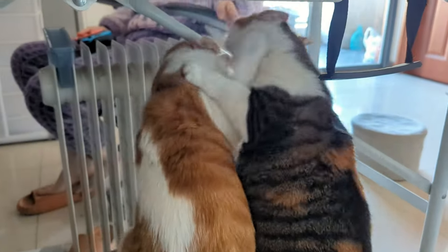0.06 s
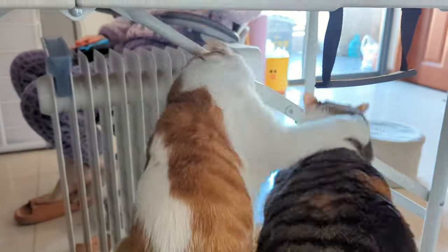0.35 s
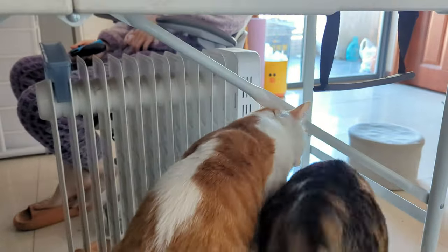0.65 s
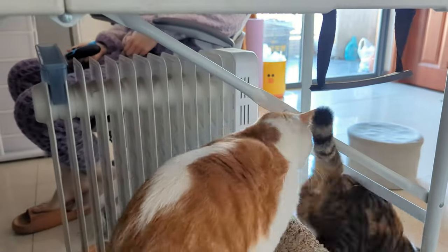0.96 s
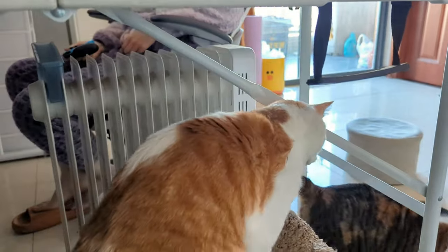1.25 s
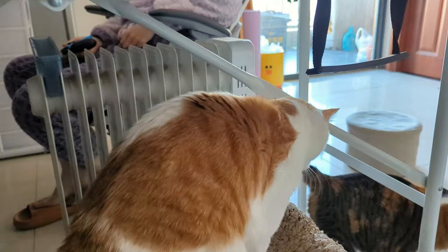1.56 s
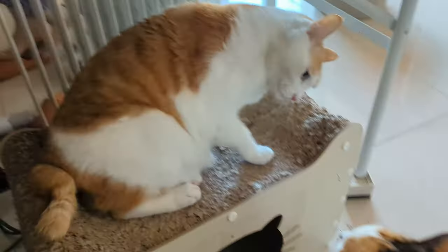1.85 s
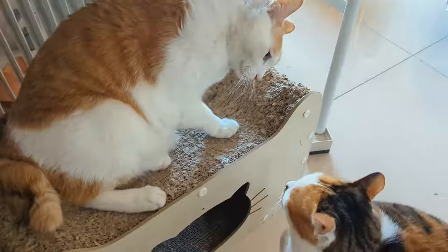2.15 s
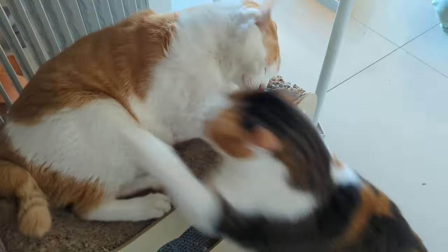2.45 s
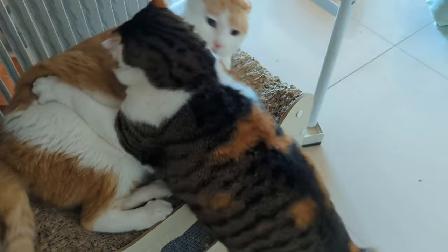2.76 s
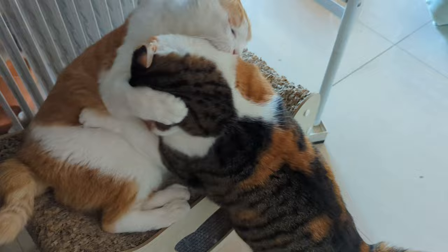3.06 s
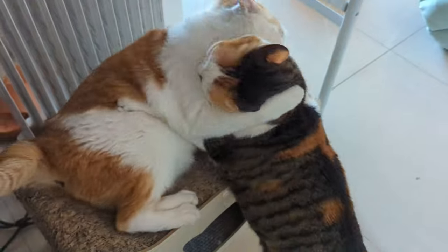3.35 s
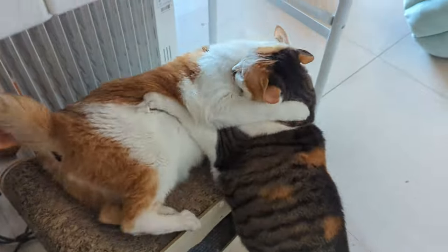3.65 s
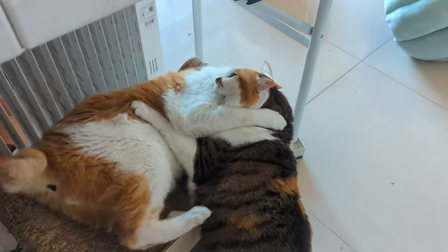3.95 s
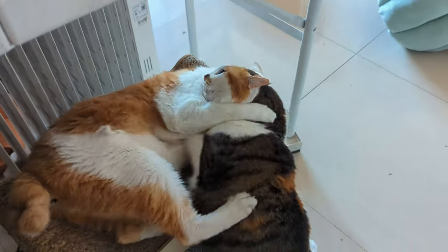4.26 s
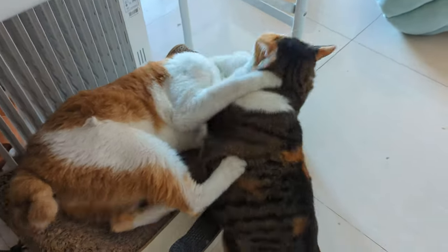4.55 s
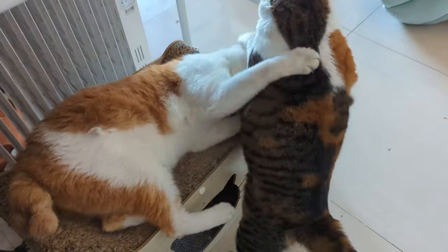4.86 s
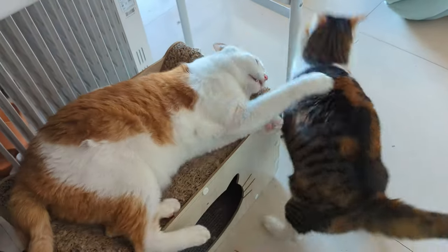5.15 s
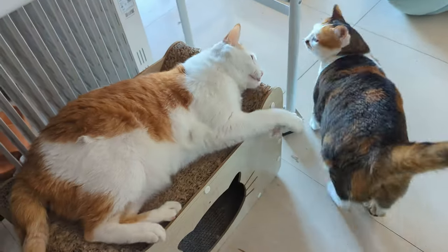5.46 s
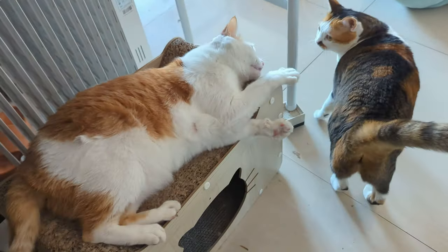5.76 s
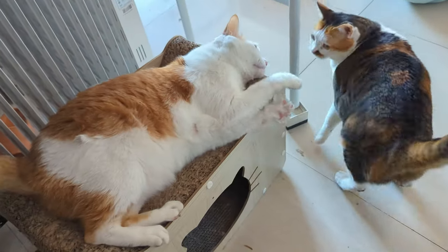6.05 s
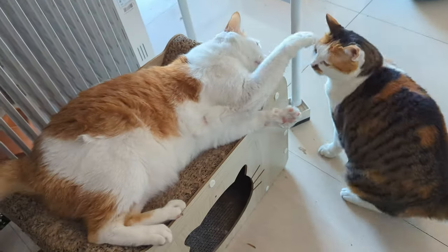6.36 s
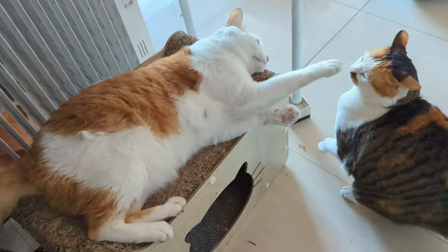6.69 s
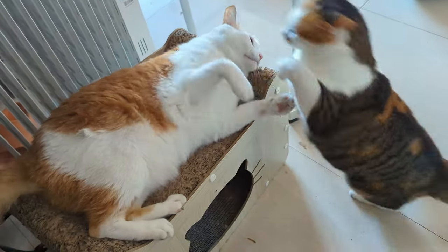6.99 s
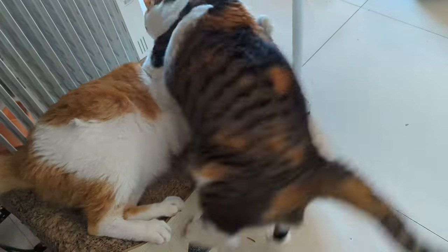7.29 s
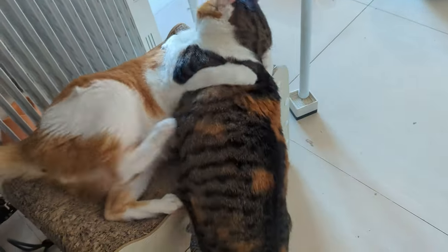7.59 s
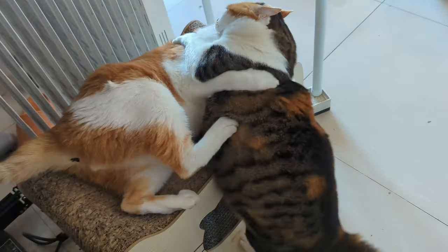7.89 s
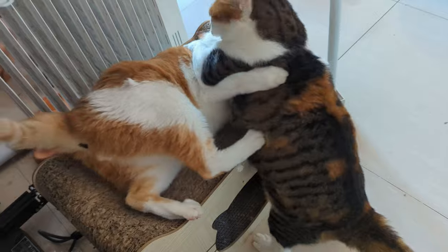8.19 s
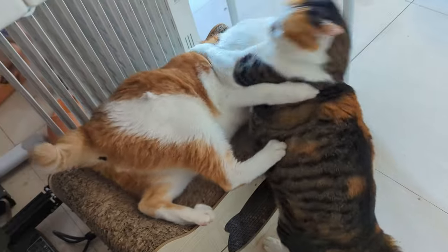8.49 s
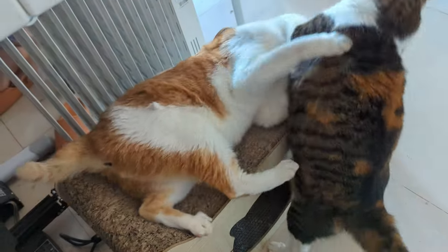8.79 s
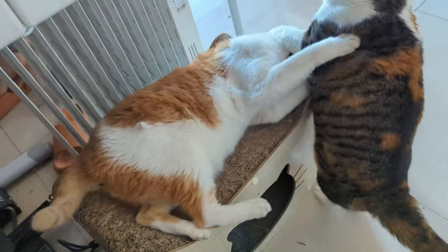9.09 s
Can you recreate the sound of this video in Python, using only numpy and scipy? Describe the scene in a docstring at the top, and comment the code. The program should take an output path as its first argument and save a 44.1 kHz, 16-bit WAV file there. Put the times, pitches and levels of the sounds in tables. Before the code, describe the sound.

Two cats scuffle on a cardboard scratcher, with soft thumps, claws scratching and snapping, and rustling fur over a low rumble.

```python
"""Two cats wrestle on a cardboard scratcher in a tiled room, close to the microphone, over a low rumble.
First a body thumps down, making the board ring, and fur hisses over its ridges. After a lull, claws
catch and snap free around 3 s. Near 4 s a light tap leads into a quick run of scuffing paw strokes.
The scratcher then shifts on the tiles, a faint tone comes in, and another tap follows near 6 s. Just
after 7 s come the hardest snap and more heavy bumps, and the scuffle ends with a few softer scratches."""
import sys
import numpy as np
from scipy import signal
from scipy.fft import rfft, irfft, next_fast_len
from scipy.io import wavfile
from scipy.ndimage import uniform_filter1d

SR = 44100
rng = np.random.default_rng(int(sys.argv[2]) if len(sys.argv) > 2 else 0)


def dump(signal):
    """Clip the signal to [-1, 1] and save it as 16-bit WAV at the path in sys.argv[1]."""
    limited = np.clip(np.atleast_2d(signal).T, -1, 1)
    pcm = np.round(limited * 32767).astype(np.int16)
    wavfile.write(sys.argv[1], SR, pcm)


N = 407043
TIME = np.arange(N) / SR

# A sound's "colour" says how strong it is at each frequency.
# the bright hiss of the paper ridges: (frequency [Hz], level [dB])
HISS_COLOUR = [(1200, -10.5), (2600, -4.5), (4000, 0.5), (6400, 3.5), (8000, -0.5), (9000, 2.5),
               (10000, -1.5), (11300, -3), (13000, -4), (15000, -6), (16000, -13.5)]
# the lower rasp of the board: (frequency [Hz], level [dB])
RASP_COLOUR = [(200, -13), (400, -1), (700, 8), (1200, 6), (2000, 5.5), (2900, -1), (4500, -20.5)]


def from_db(db):
    """Turn decibels into a number to multiply a sound by."""
    return 10 ** (np.asarray(db) / 20)


def rms_one(x):
    """Scale a sound so that its average strength (rms) is 1."""
    return x / np.sqrt(np.mean(x ** 2) + 1e-20)


def at_level(x, db, over_s):
    """Scale a burst so that its energy, spread over over_s seconds, has this level in each channel."""
    return x * from_db(db) * np.sqrt(over_s * SR / np.sum(x ** 2, axis=-1, keepdims=True))


def in_time(curve):
    """Join (time, value) points with straight lines, giving a value for every sample."""
    return np.interp(TIME, *np.transpose(curve))


def at_hz(points, hz):
    """Read between (frequency, value) points, giving each octave equal space."""
    known_hz, values = np.transpose(points)
    return np.interp(np.log(np.maximum(hz, 1)), np.log(known_hz), values)


def add(out, start_s, sound):
    """Mix a sound in at the given time."""
    i = max(round(start_s * SR), 0)
    out[:, i:i + sound.shape[-1]] += sound[..., :N - i]


def colour(pair, spectrum):
    """Give two unrelated signals a colour and make their bass alike, as two close microphones hear it."""
    # how alike left and right are: (frequency [Hz], likeness [1 = same, 0 = unrelated])
    likeness = [(60, 0.98), (250, .9), (500, 0.68), (1000, 0.073), (2500, 0.086), (6000, -0.18),
                (14000, 0.21)]
    size = next_fast_len(pair.shape[1])
    hz = np.arange(size // 2 + 1) * SR / size
    mid, side = rfft(pair, size) * from_db(at_hz(spectrum, hz))
    alike = np.clip(at_hz(likeness, hz), -1, 1)
    both = np.sqrt(1 + alike) * mid + np.sqrt(1 - alike) * side * [[1], [-1]]
    return rms_one(irfft(both, size)[:, :pair.shape[1]])


def noise(spectrum, size=N):
    """Smooth stereo noise of a given colour."""
    return colour(rng.standard_normal((2, size)), spectrum)


def throb(spectrum):
    """Noise with its slow swings evened out, so a deep sound throbs without dropping out."""
    x = noise(spectrum)
    return x / np.sqrt(uniform_filter1d(np.mean(x ** 2, axis=0), size=SR // 6))


def drift(per_s):
    """A random wander, roughly between -1 and 1, that turns per_s times a second."""
    points = rng.standard_normal(4000)
    return np.interp(TIME * per_s, np.arange(len(points)), points)


def grains(per_s, spread_db, size=N):
    """Tiny slips: clicks of uneven size at random moments, in both channels."""
    happens = rng.random(size) < per_s / SR
    sizes = from_db(spread_db * np.minimum(rng.exponential(1, size), 4))
    return rms_one(happens * sizes * rng.standard_normal((2, size)))


def resonate(x, hz, width_hz):
    """Make a sound ring near one pitch by passing it twice through the same narrow filter."""
    r = np.exp(-np.pi * width_hz / SR)
    forward = np.array([1, 0, -1]) * (1 - r * r) / 2
    feedback = [1, -2 * r * np.cos(2 * np.pi * hz / SR), r * r]
    return signal.lfilter(forward, feedback, signal.lfilter(forward, feedback, x))


def wavering_tone(level_curve, hz, width_hz):
    """A ringing tone kept going by random pushes."""
    return from_db(in_time(level_curve)) * rms_one(resonate(rng.standard_normal(N), hz, width_hz))


def room(x, wet_db, first_echo_s=0.00073):
    """Add the blurred echo of tiles and furniture at level wet_db; its bass lasts longest."""
    # how long the room rings: (frequency [Hz], time to fade by 60 dB [s])
    fade_times = [(100, 0.45), (300, 0.3), (1000, 0.3), (3000, 0.29), (6500, 0.23), (14000, 0.22)]
    t = TIME[:SR * 3 // 4]
    white, tail = noise([(50, 0), (16000, 0)], size=len(t)), 0
    edges_hz = np.geomspace(60, 17000, 9)
    for low, high in zip(edges_hz, edges_hz[1:]):
        band = signal.sosfilt(signal.butter(2, [low, high], "band", fs=SR, output="sos"), white)
        tail = tail + band * from_db(-60 * t / at_hz(fade_times, np.sqrt(low * high)))
    tail = rms_one(tail * (t > first_echo_s)) / np.sqrt(len(t))
    return x + from_db(wet_db) * signal.fftconvolve(x, tail, axes=1)[:, :N]


def near_echoes(x):
    """Hard surfaces close by add a few quick echoes; the overall level stays about the same."""
    # echoes off tiles, radiator and scratcher: (left delay [s], right delay [s], level [dB])
    reflections = [(.0013, 0.0015, -16.5), (.0031, 0.0035, -10.5), (.0058, .0067, -13),
                   (0.0122, 0.011, -12)]
    out, power = x.copy(), 1
    for *delays_s, db in reflections:
        for side, delay_s in enumerate(delays_s):
            lag = round(delay_s * SR)
            out[side, lag:] += from_db(db) * x[side, :-lag]
        power += from_db(db) ** 2
    return out / np.sqrt(power)


def rumble(boost_db=2.5, usual_db=-58.5, drone_rest_db=-58, drone_follows=0.52):
    """A deep boom swells and sinks; a drone just above it follows about half as far."""
    # the boom's swells, before the boost: (time [s], level [dB])
    swells = [(0, -66), (0.42, -46), (0.75, -61), (1.0, -55), (1.25, -61), (1.85, -56), (2.15, -64.5),
              (2.35, -58), (2.95, -71.5), (3.7, -64.5), (4.1, -69), (4.9, -62.5), (5.65, -54.5),
              (6.25, -64.5), (6.85, -60.5), (7.4, -43.5), (8.65, -61), (9.23, -59)]
    # colours of the boom and the drone: (frequency [Hz], level [dB])
    boom_colour = [(20, -25), (33, -22), (43, -8), (52.5, 7.5), (61, -7), (75, -32.5), (120, -69.5)]
    drone_colour = [(45, -32), (62, -10), (72, 5.5), (83, -6.5), (97, -5.5), (125, -27), (200, -77)]
    boom_db = in_time(swells)
    drone_db = drone_rest_db + drone_follows * (boom_db - usual_db)
    return from_db(boom_db + boost_db) * throb(boom_colour) + from_db(drone_db) * throb(drone_colour)


def room_air(stir_boost_db=0.14, air_db=-73.5):
    """The room's dull stir rises and falls under the thin, steady hiss of the air."""
    # the stir's swells, before the boost: (time [s], level [dB])
    swells = [(0.0, -67), (0.49, -59), (1.72, -66), (2.65, -63), (3.7, -67.5), (5.01, -59), (6.48, -67.5),
              (7.07, -68.5), (7.25, -62), (9.23, -64)]
    # colours of the stir and the air: (frequency [Hz], level [dB])
    stir_colour = [(80, -13), (120, 5.5), (170, 4.5), (240, 2.5), (370, 1), (460, -7.5), (580, -8.5),
                   (800, -20.5), (1500, -66.5)]
    air_colour = [(250, -2), (400, 8), (600, -5.5), (850, -2), (1300, -4.5), (2100, -19), (3500, -22),
                  (5000, -25), (7000, -32.5), (9500, -39.5), (15000, -28)]
    stir = from_db(in_time(swells) + stir_boost_db) * noise(stir_colour)
    return stir + from_db(air_db) * noise(air_colour)


def whine():
    """A faint tone comes up in the background about halfway through."""
    # the tone's loudness: (time [s], level [dB])
    levels = [(4.9, -97), (5.2, -71.5), (5.85, -72), (6.3, -77), (7.0, -80), (8.0, -77.5), (9.23, -80.5)]
    return wavering_tone(levels, hz=598, width_hz=53)


def board_shift():
    """The scratcher shifts on the tiles with a low hum."""
    # the hum's loudness: (time [s], level [dB])
    levels = [(4.68, -79), (4.8, -64), (4.9, -60.5), (5.1, -59), (5.28, -55.5), (5.42, -69), (5.55, -80)]
    return wavering_tone(levels, hz=163, width_hz=33)


def squeaks(fade_s=0.02, silent_db=-120):
    """Each squeak is a brief wavering tone that fades in and out."""
    # small squeaks: (start [s], length [s], level [dB], pitch [Hz])
    chirps = [(0.894, 0.04, -63, 1237), (4.17, 0.17, -74.5, 3170)]
    out = 0
    for start, length, db, hz in chirps:
        end = start + length
        levels = [(start - fade_s, silent_db), (start, db), (end, db), (end + fade_s, silent_db)]
        out = out + wavering_tone(levels, hz, width_hz=0.02 * hz)
    return out


def taps(thump_hz=170, thump_s=0.0014, tick_hz=1100, tick_s=0.0005):
    """A light touch beside the right microphone makes a dry tick and a very short thump."""
    # the touches: (time [s], level on the right [dB])
    touches = [(3.728, -26.5), (6.1205, -23.5)]
    out, t = np.zeros((2, N)), TIME[:SR // 20]
    thump = np.sin(2 * np.pi * thump_hz * t) * np.exp(-t / thump_s)
    tick = 0.49 * np.sin(2 * np.pi * tick_hz * t) * np.exp(-t / tick_s)
    for start, db in touches:
        add(out, start, from_db(db) * (thump + tick))
    return out * from_db([[-22], [0]])  # much quieter on the left


def slide_levels(bite_db_per_s=380.5, release_db_per_s=148, arch_db=2.5, rustle_hiss_db=-3.5):
    """Hiss and rasp levels in dB: each slide bites fast, is firmest midway and lets go more slowly."""
    # slides over the ridges, before rubbing()'s gains: (start [s], length [s], hiss [dB], rasp [dB])
    slides = [(0.111, 0.02, -63.5, -59.5), (0.215, 0.036, -57, -74), (0.309, 0.058, -43, -53),
              (0.425, 0.27, -54, -62), (0.695, 0.22, -52.5, -59.5), (1.815, .03, -63, -65.5),
              (1.951, 0.08, -56, -63.5), (2.162, 0.1, -93, -69.5), (2.456, 0.12, -54.5, -63),
              (2.664, 0.12, -45.5, -58.5), (2.784, 0.094, -43.5, -56.5), (2.993, 0.11, -56, -63),
              (3.24, 0.019, -64, -66.5), (3.521, 0.051, -56.5, -69.5), (3.646, 0.34, -60, -73.5),
              (3.98, 0.47, -72.5, -66), (4.328, 0.42, -64.5, -60), (5.084, 0.66, -66, -68.5),
              (5.54, 0.37, -58.5, -67.5), (5.689, .03, -52, -77), (5.99, 0.088, -69.5, -70),
              (7.185, 0.13, -57, -68.5), (7.386, 0.088, -37.5, -47.5), (7.53, 0.26, -60.5, -68),
              (7.872, 0.15, -57.5, -66.5), (8.109, 0.017, -45, -62.5), (8.497, 0.54, -63.5, -66),
              (8.667, 0.072, -47.5, -59)]
    # faint rustle of fur between the slides: (time [s], level [dB])
    rustle = [(0, -72.5), (1.1, -74), (1.7, -83.5), (2.4, -70), (3.4, -72.5), (4.9, -70), (6.9, -76),
              (8.3, -71), (9.23, -67.5)]
    t = np.linspace(0, N / SR, 4000)
    rustle_db = np.interp(t, *np.transpose(rustle))
    power = from_db([rustle_db + rustle_hiss_db, rustle_db]) ** 2
    for start, length, hiss_db, rasp_db in slides:
        bite = bite_db_per_s * np.maximum(start - t, 0)
        arch = arch_db * np.clip(2 * (t - start) / length - 1, -1, 1) ** 2
        release = release_db_per_s * np.maximum(t - start - length, 0)
        drop_db = bite + arch + release
        power = power + from_db([hiss_db - drop_db, rasp_db - drop_db]) ** 2
    return [np.interp(TIME, t, 10 * np.log10(p)) for p in power]


def rubbing(hiss_gain_db=-6.0, rasp_gain_db=0.5, uneven_db=2.22, light_db=-74, firm_db=-54):
    """Fur and pads slide over paper edges, pressing unevenly: many tiny slips and a few coarser catches."""
    hiss_db, rasp_db = slide_levels()
    slips = grains(per_s=20000, spread_db=1.1) * from_db(uneven_db * drift(per_s=70))
    friction = slips + 0.35 * grains(per_s=260, spread_db=2.5)
    bright = colour(friction, HISS_COLOUR)
    # only a firm touch brings out the highest treble
    dull = signal.sosfilt(signal.butter(3, 7500, "low", fs=SR, output="sos"), noise(HISS_COLOUR))
    firmness = np.clip((hiss_db - light_db) / (firm_db - light_db), 0, 1)
    hiss = from_db(hiss_db + hiss_gain_db) * (firmness * bright + np.sqrt(1 - firmness ** 2) * dull)
    rasp = from_db(rasp_db + rasp_gain_db) * colour(friction, RASP_COLOUR)
    return room(near_echoes(hiss) + rasp, wet_db=-18.0)


def paw_strokes(rise_s=0.0012, hold_s=0.0063, fade_s=0.019):
    """A paw drags over the ridges for an instant: the hollow board sounds under the claws' scrape."""
    # quick strokes: (time [s], level [dB], scrape compared with the stroke [dB])
    strokes = [(3.938, -47, -26), (4.120, -43.5, -18.5), (4.214, -47.5, -12), (4.334, -42, -12),
               (4.368, -54.5, -5), (4.411, -41, -9.5), (4.462, -42, -12.5), (4.515, -43, -12.5),
               (4.633, -42.5, -15.5)]
    # colours of the hollow board and the scrape: (frequency [Hz], level [dB])
    hollow_colour = [(150, -6), (270, -4.5), (366, 8), (470, -2), (680, -4.5), (877, 0), (1300, -11.5),
                     (2000, -11), (2800, -17), (3600, -25), (6000, -36.5)]
    scrape_colour = [(800, -29), (2000, 1), (3300, -3), (4500, 5.5), (6200, 7.5), (8000, 6), (9700, -2),
                     (15000, -15)]
    out, t = np.zeros((2, N)), TIME[:SR // 6]
    pressure = (1 - np.exp(-t / rise_s)) * np.exp(-np.maximum(t - hold_s, 0) / fade_s)
    for start, db, scrape_db in strokes:
        slips = grains(per_s=5100, spread_db=1.0, size=len(t))
        scuff = colour(slips, hollow_colour) + from_db(scrape_db) * colour(slips, scrape_colour)
        add(out, start, from_db(db) * pressure * scuff)
    return room(out, wet_db=-6.0)


def claw_skips(snaps, hard_db=-32.5, delay_s=0.0058, drop_db=4, loss_db=0.5, fade_s=0.0061):
    """A hard-pulled claw skips over two more ridges, each catch later, weaker and more drawn out."""
    return [(start + delay_s * k ** 2, db - drop_db - loss_db * k, hz, width_hz, fade_s * k ** 2)
            for start, db, hz, width_hz, _ in snaps if db > hard_db for k in (1, 2)]


def claw_snaps(rise_s=0.00063, crack_db=-5, broad_hz=4000):
    """A claw tears free of a paper ridge: a burst of slips gives a crack and a bright ring."""
    # the snaps: (time [s], level [dB], pitch [Hz], width of the ring [Hz], fade time [s])
    snaps = [(.091, -63.5, 5500, 4000, 0.0018), (.219, -57, 5970, 3000, .003),
             (.714, -49, 4520, 5000, 0.0029), (.769, -44.5, 4740, 2000, .003),
             (.993, -57, 9150, 6000, 0.0014), (1.930, -56.5, 4540, 2490, 0.0051),
             (2.292, -63, 5500, 3000, 0.001), (2.658, -43.5, 4750, 4100, 0.0014),
             (2.849, -55, 4930, 2980, .00085), (2.871, -39.5, 4200, 3000, 0.00065),
             (3.0, -47.5, 6200, 2000, 0.0065), (3.0466, -31.5, 6400, 938, .0007),
             (3.047, -34, 8800, 3000, 0.00067), (3.140, -50.5, 7000, 4000, 0.01),
             (3.519, -50, 4260, 3030, 0.013), (3.611, -35.5, 4050, 4670, 0.0046),
             (3.696, -52, 4940, 4000, 0.0012), (3.7263, -42, 5300, 3020, 0.0058),
             (3.942, -42, 2580, 600, 0.011), (4.028, -56.5, 6300, 3970, .003),
             (5.217, -49.5, 6640, 1290, 0.011), (5.365, -53, 5800, 2000, 0.013),
             (5.964, -55.5, 6400, 2960, 0.0055), (7.086, -61, 6380, 5870, 0.0032),
             (1.797, -62.5, 4870, 4000, .015), (7.169, -61, 5420, 4000, .004),
             (7.322, -29.5, 7100, 6000, 0.016), (7.3573, -21, 5630, 2310, 0.003),
             (7.471, -35, 8400, 4870, 0.002), (7.886, -52, 4250, 3930, 0.012),
             (8.098, -40, 6650, 1500, 0.04), (8.672, -41.5, 5140, 1500, 0.05)]
    out, t = np.zeros((2, N)), TIME[:SR // 8]
    for start, db, hz, width_hz, fade_s in snaps + claw_skips(snaps):
        contact = (1 - np.exp(-t / rise_s)) * np.exp(-t / fade_s)
        ring = resonate(rng.standard_normal((2, len(t))) * contact, hz, width_hz)
        crack = (noise(HISS_COLOUR, len(t)) + 0.2 * noise(RASP_COLOUR, len(t))) * contact
        crack_share = np.sqrt(width_hz / broad_hz)  # the purer the ring, the less crack
        add(out, start, at_level(ring, db, over_s=0.00077))
        add(out, start, crack_share * at_level(crack, db + crack_db, over_s=0.0041))
    return room(out, wet_db=-7.5)


def board_ring(t, main_hz, stretch, selectivity=2.0):
    """The struck scratcher rings with its own fading tones, favouring those near main_hz."""
    # the board's tones: (pitch [Hz], level [dB], time to fade by 60 dB before stretching [s])
    tones = [(132, 0.5, 0.26), (179.7, -3.5, 0.32), (231.3, 2, 0.28), (280.8, 4.5, 0.18), (361, 0.5, 0.16),
             (432, -1.5, 0.079), (498, -3.5, 0.2), (590, 0, .05), (647, 3.5, 0.042), (739, -0.5, 0.11),
             (932, 0, 0.1), (955, -13.5, 0.046), (1280, -11, 0.099), (1490, 0.5, 0.014), (1660, -2, 0.06)]
    ring = 0
    for k, (hz, db, fade_s) in enumerate(tones):
        share = 1 / np.hypot(1, selectivity * (hz / main_hz - main_hz / hz))
        fade = from_db(db + rng.normal(0, 2.1) - 60 * t / (fade_s * stretch))
        ring = ring + (-1) ** k * share * fade * np.sin(2 * np.pi * hz * t)
    return ring


def settling(landings, heavy_db=-34.5, delay_s=0.027, push_db=-39.5, stretch=1.38, crunch_db=-17):
    """After a heavy landing the body's weight settles with a second, softer push."""
    return [(start + delay_s, push_db, hz, stretch, crunch_db)
            for start, db, hz, _, _ in landings if db > heavy_db]


def body_bumps(push_s=0.006, roughness=0.062, crunch_rise_s=0.0065, crunch_fade_s=0.0056):
    """A soft body lands: its uneven push rings the board and crunches the ridges."""
    # bodies and paws landing:
    # (time [s], level [dB], favoured pitch [Hz], ring stretch [times], crunch compared with thud [dB])
    landings = [(.235, -42, 270, 1.3, -7), (.345, -25, 440, 0.38, -11), (.553, -55.5, 500, 0.4, -9),
                (.711, -52.5, 400, 0.54, 5.5), (.934, -37, 195, 0.94, -20), (1.824, -52.5, 150, 1.3, -20),
                (2.291, -64, 120, 1.2, -18), (2.491, -33.5, 309.5, .7, -7.5),
                (3.611, -58.5, 800, 0.29, 12.5), (3.694, -56, 400, 0.16, 1), (3.730, -56, 120, .4, 2),
                (5.207, -58.5, 160, 0.88, 4), (7.086, -47.5, 297, 1.1, -12), (7.169, -46.5, 300, 1.2, -16),
                (7.364, -35, 205, 0.82, -3.5), (7.405, -33.5, 455, 0.63, -16),
                (8.151, -46.5, 138, 0.89, -6.5), (8.68, -51, 660, 3.6, -8)]
    out, t = np.zeros((2, N)), TIME[:SR // 3]
    crunch_shape = (1 - np.exp(-t / crunch_rise_s)) * np.exp(-t / crunch_fade_s)
    for start, db, main_hz, stretch, crunch_db in landings + settling(landings):
        push = roughness * rng.standard_normal(len(t)) * np.exp(-t / push_s) / np.sqrt(push_s * SR / 2)
        push[0] += 1  # the first sharp contact
        thud = signal.fftconvolve(push, board_ring(t, main_hz, stretch))[:len(t)]
        crunch = noise(RASP_COLOUR, len(t)) * crunch_shape
        add(out, start, at_level(thud, db, over_s=0.0074))
        add(out, start, at_level(crunch, db + crunch_db, over_s=0.0026))
    return room(out, wet_db=1.0)


def scene():
    """The scuffle over the room's background."""
    scuffle = body_bumps() + claw_snaps() + paw_strokes() + rubbing() + board_shift() + squeaks()
    return scuffle + taps() + rumble() + room_air() + whine()


def record(dry, low_cut_hz=47, high_cut_hz=15900):
    """The right microphone's opening rings in the treble; both sides lose the deepest bass and the top."""
    # peaks and a dip of that opening: (frequency [Hz], width [Hz], gain [dB])
    opening = [(3120, 3100, 0.5), (4290, 3950, 8.5), (6240, 2300, 6.5), (7710, 3550, 8.5), (9940, 6400, -4)]
    left, right = dry
    for hz, width_hz, gain_db in opening:
        angle, root_gain = 2 * np.pi * hz / SR, from_db(gain_db / 2)
        spread = np.sin(angle) * width_hz / (2 * hz)
        forward = [1 + spread * root_gain, -2 * np.cos(angle), 1 - spread * root_gain]
        feedback = [1 + spread / root_gain, -2 * np.cos(angle), 1 - spread / root_gain]
        right = signal.lfilter(forward, feedback, right)
    both = signal.sosfilt(signal.butter(4, low_cut_hz, "high", fs=SR, output="sos"), [left, right])
    return signal.sosfilt(signal.ellip(10, 0.1, 80, high_cut_hz, fs=SR, output="sos"), both)


dry = scene()
out = record(dry)
dump(out)
```